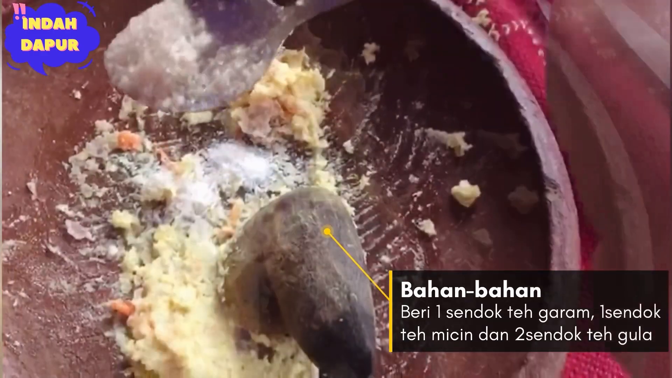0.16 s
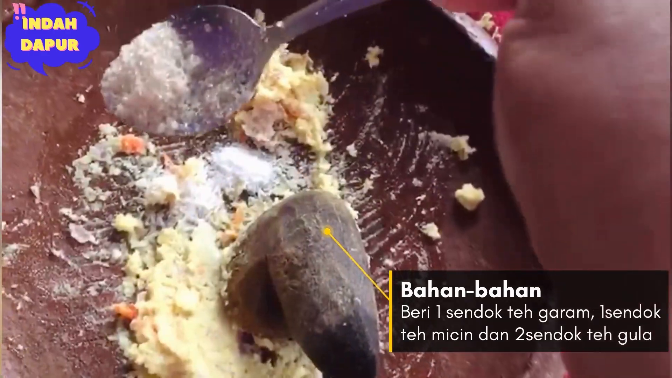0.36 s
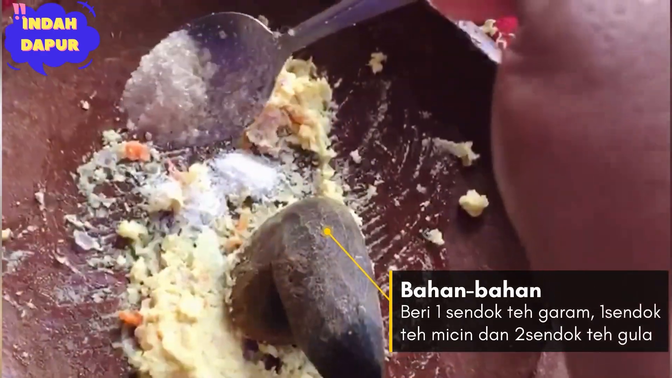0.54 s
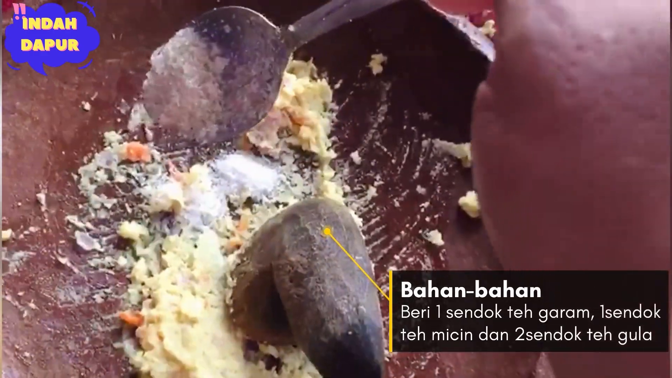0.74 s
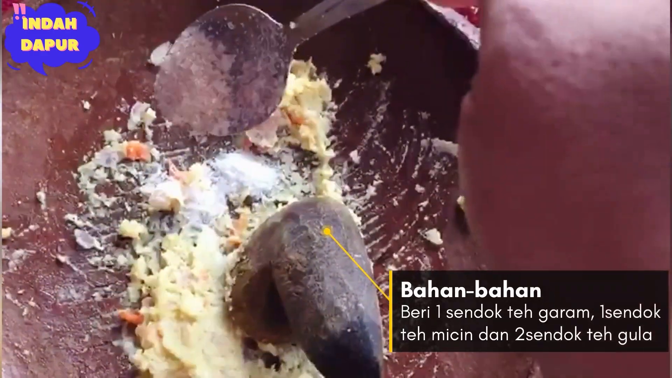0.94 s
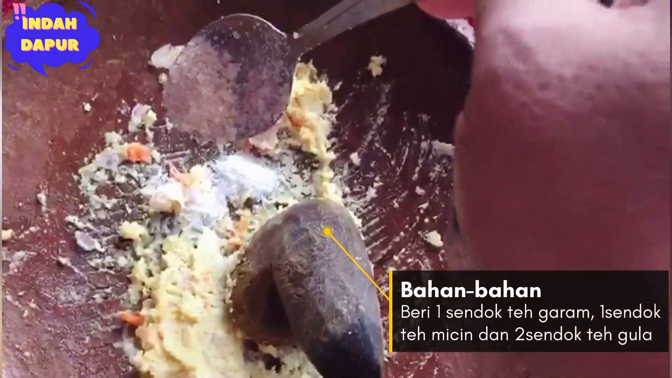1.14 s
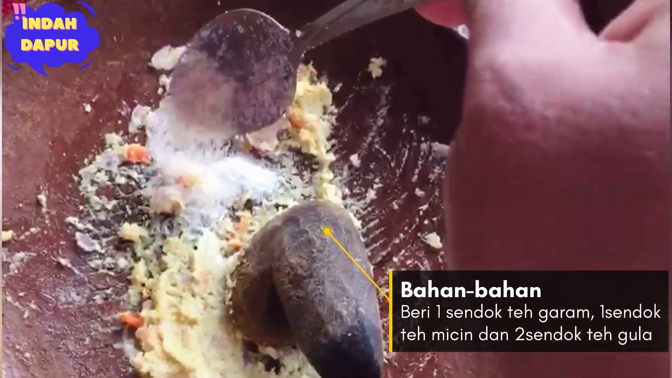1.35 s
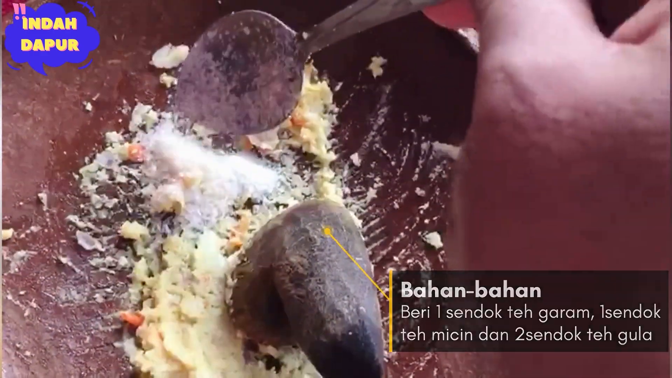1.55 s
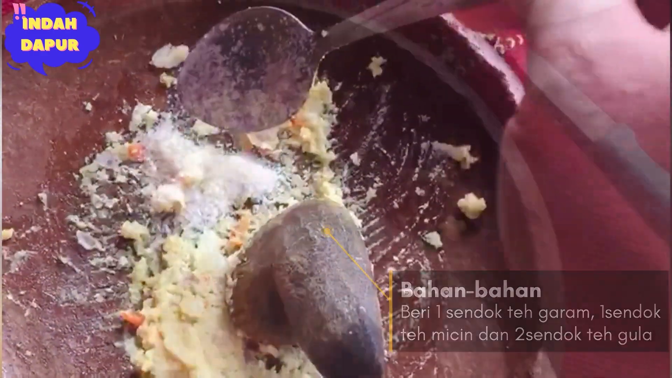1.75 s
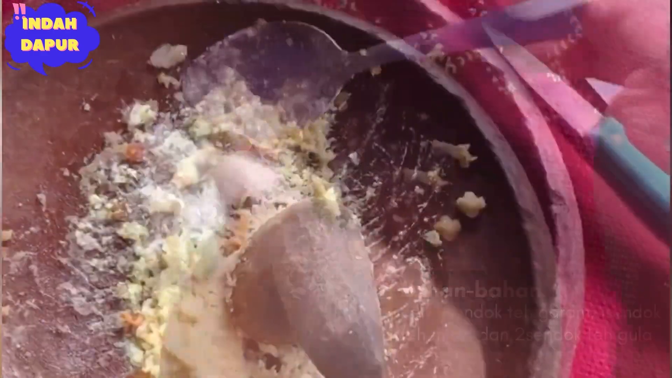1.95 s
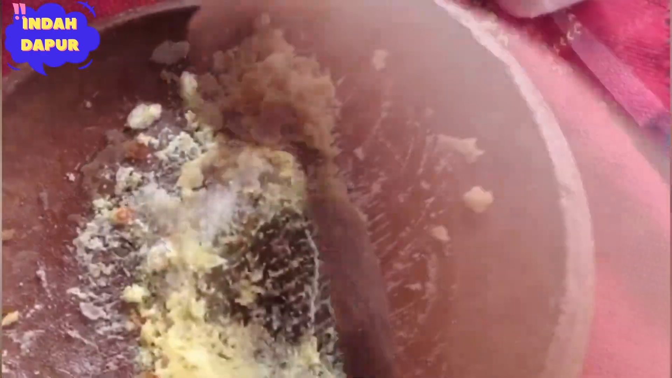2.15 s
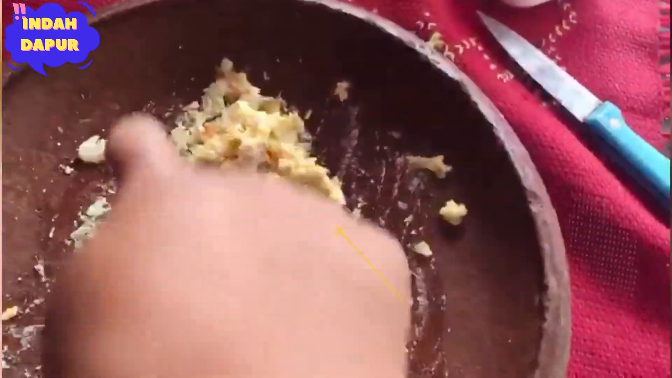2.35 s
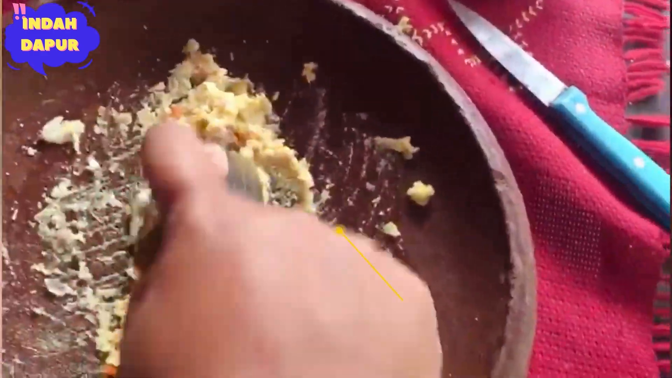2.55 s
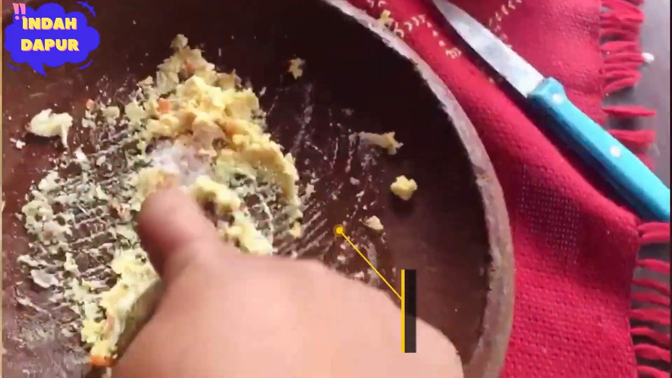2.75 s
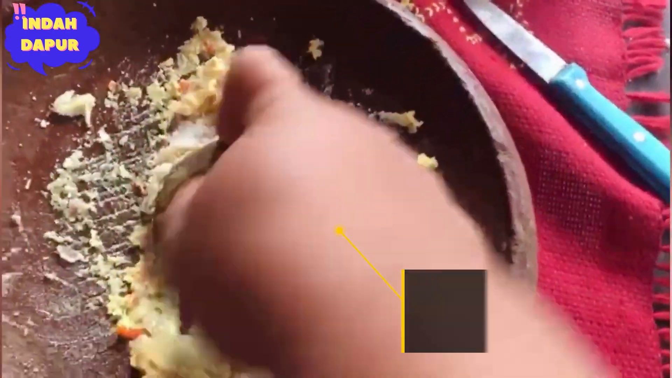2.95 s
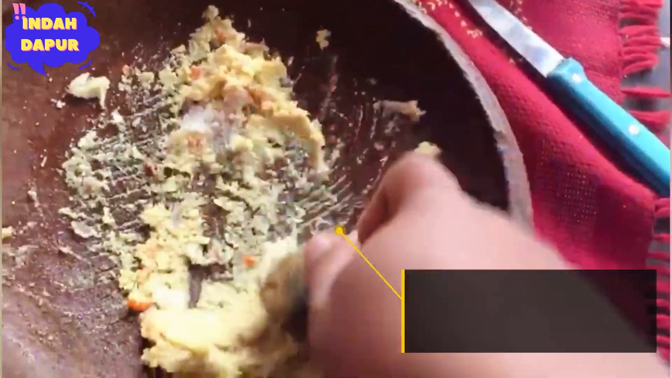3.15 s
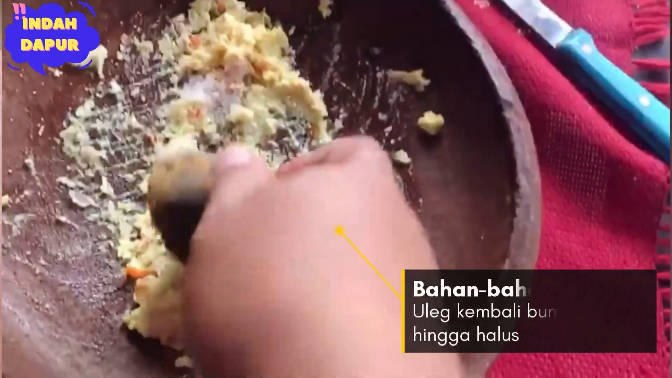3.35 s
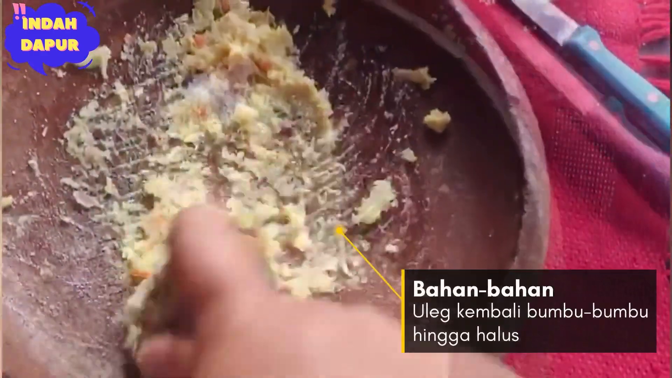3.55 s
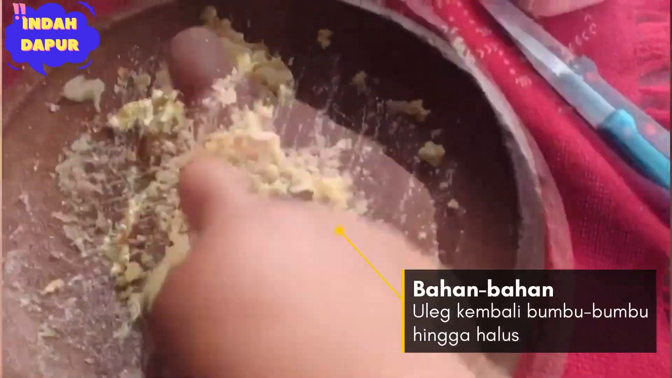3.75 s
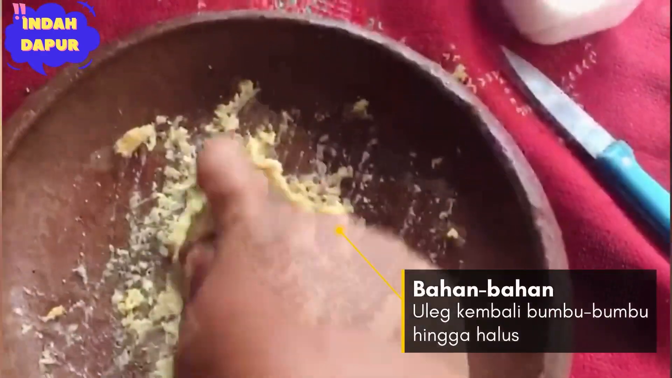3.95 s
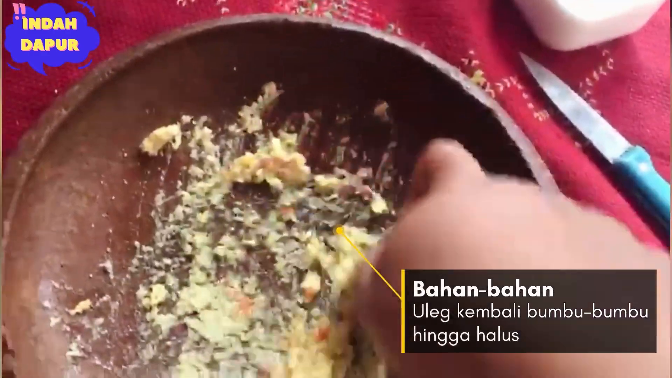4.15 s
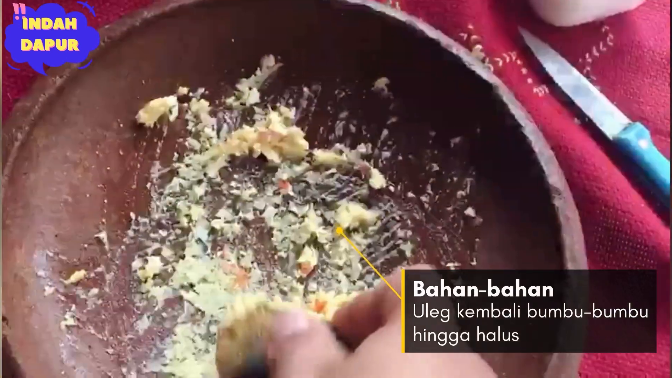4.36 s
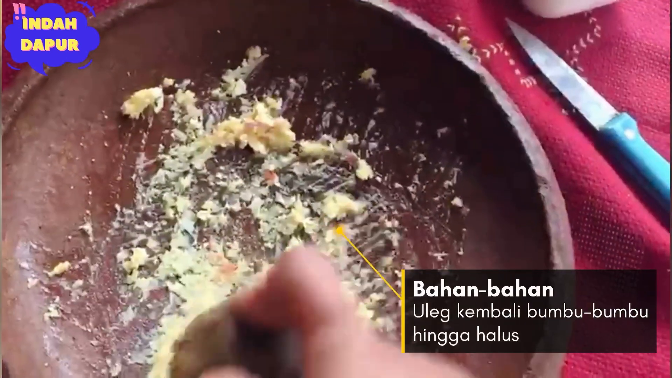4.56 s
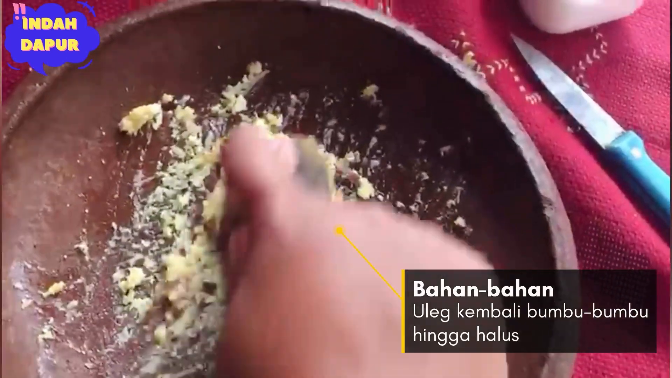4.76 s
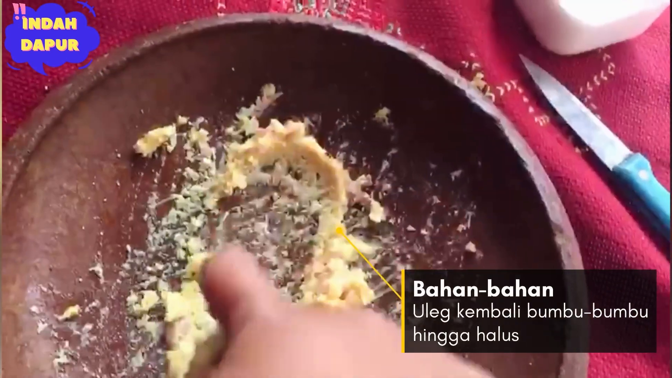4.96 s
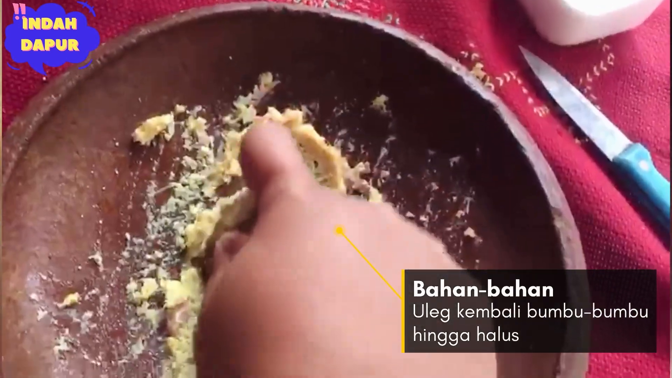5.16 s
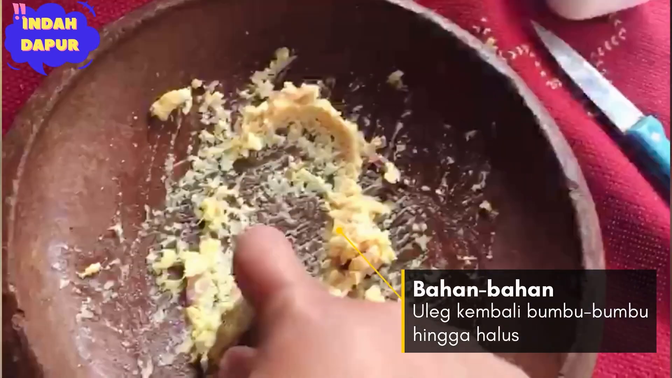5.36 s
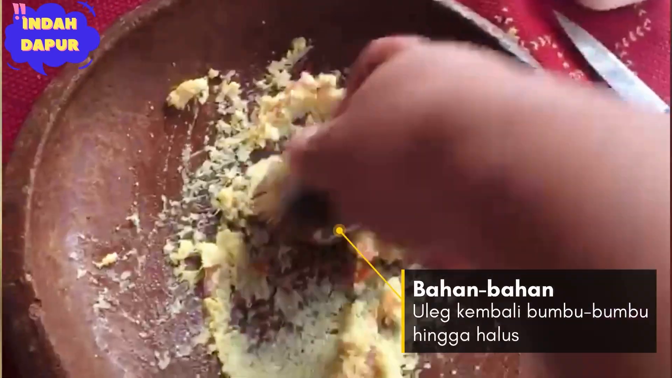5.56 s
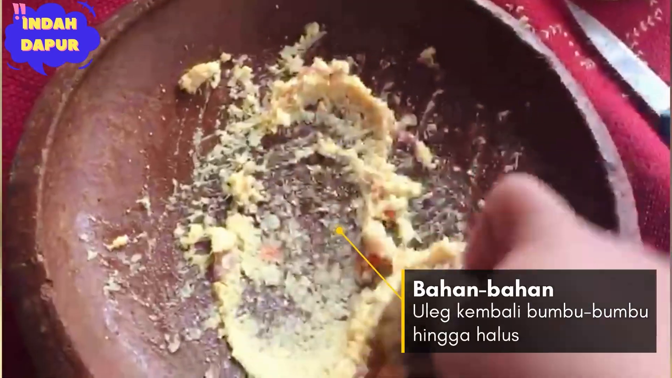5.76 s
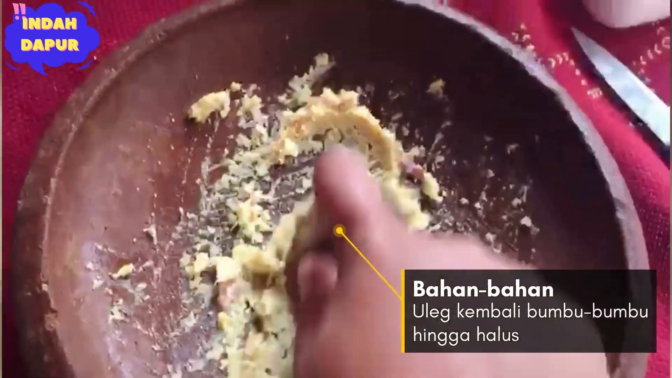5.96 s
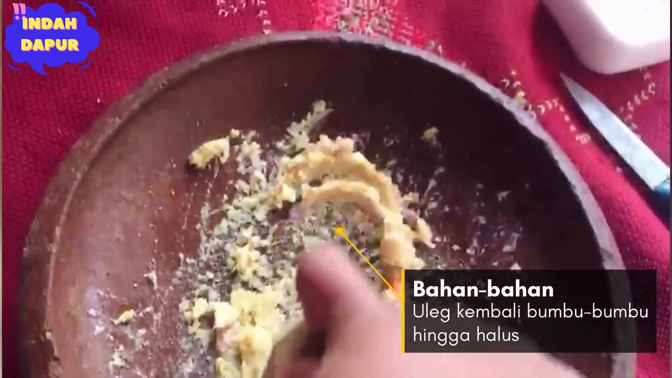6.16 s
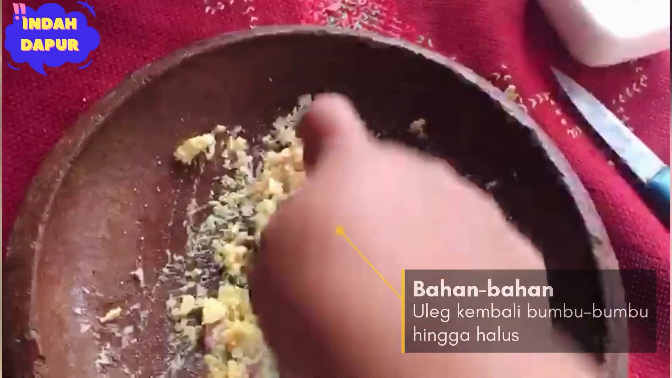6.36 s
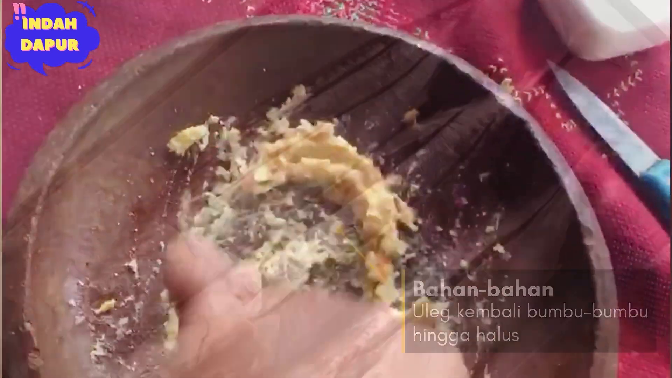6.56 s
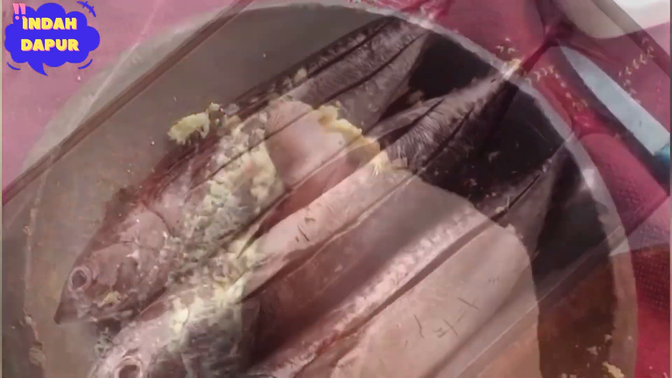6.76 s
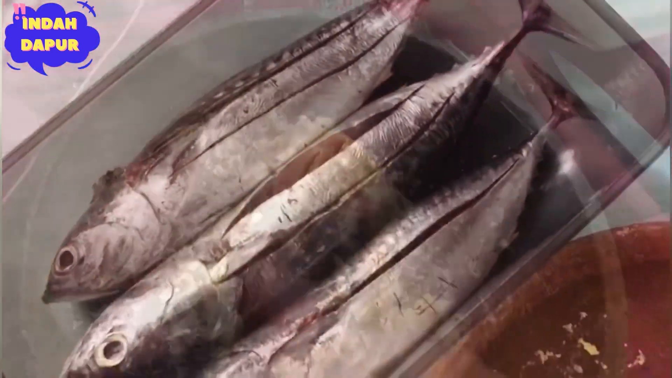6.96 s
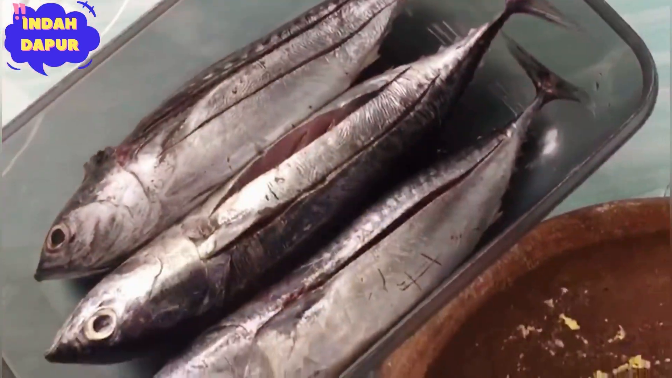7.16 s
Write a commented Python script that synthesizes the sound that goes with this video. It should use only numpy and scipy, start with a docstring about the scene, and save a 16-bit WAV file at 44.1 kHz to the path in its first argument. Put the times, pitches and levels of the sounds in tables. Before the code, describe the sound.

A small kitchen's faint hum and hiss run throughout. Salt and sugar slide off a spoon in three very soft rustles, near 0.1, 0.7 and 1.3 seconds. Around 1.8 and 2 seconds a stone pestle lightly touches the mortar. From about 2.4 seconds it grinds spice paste close to the microphone, scraping to and fro five or six times a second. The strokes are gritty, with crackling crystals, a brief stony ring and irregular sharp clacks, the sharpest near 3.1 seconds. The mortar rumbles low on its cloth, bumps softly around 3.4 to 3.7 seconds, then thumps the table hard near 4.8 seconds and louder still at 6 seconds. The grinding carries on, weakening toward 7 seconds, while a very faint, slightly wavering thin tone enters at about 6.8 seconds. The room adds only a very short reverberation.

```python
"""Close up in a small kitchen, a spoon tips salt and sugar into a shallow stone mortar with soft rustles.
Near 2 s a stone pestle starts on the spice paste, then scrapes to and fro about six times a second:
crystals crackle, the stone rings briefly and bare contacts clack. The mortar rocks on its cloth and
thumps the table hard twice, near 4.8 s and 6 s. A faint thin tone joins the last strokes,
over the room's steady hum and hiss."""
import sys
import numpy as np
from scipy import signal
from scipy.fft import rfft, irfft, next_fast_len
from scipy.io import wavfile
from scipy.ndimage import uniform_filter1d, map_coordinates

SR = 44100
rng = np.random.default_rng(int(sys.argv[2]) if len(sys.argv) > 2 else 0)


def log_audio(samples):
    """Write samples as a 16-bit WAV file to the path given in sys.argv[1]."""
    # one column per channel
    frames = np.atleast_2d(samples).T
    # limit to full scale, then quantise
    limited = np.clip(frames, -1, 1)
    pcm = np.round(limited * 32767).astype(np.int16)
    wavfile.write(sys.argv[1], SR, pcm)


N = 317819

# pestle strokes; ring, scuff, crackle and singing are relative to the rasp: (time [s], length [s],
# rasp [dB], mid-stroke swell [dB], ring [dB], scuff [dB], crackle [dB], singing [dB], rumble [dB])
PESTLE_STROKES = [ (1.803, 0.024, -62.5, 6, 11, 1, -9, -14, -68),
                  (1.985, 0.085, -71.5, -0.5, 7, 12, -2, -15, -82),
                  (2.367, 0.082, -42, 2.5, 3, 5, -6, -23, -67),
                  (2.551, 0.062, -48, -1.5, 8.5, -4, -2.5, -15, -54.5),
                  (2.705, 0.069, -39, 5, 9, -1.5, -2, -15, -64),
                  (2.873, 0.1, -41.5, 6, 5, -8, -6.5, -18, -59),
                  (3.046, 0.024, -55.5, -1, 17.5, 5, -5, -10, -57.5),
                  (3.090, 0.041, -44.5, -2, 7.5, 8, -15, -2, -54),
                  (3.150, 0.057, -49.5, 3, 3, 9, -24, -2, -54),
                  (3.238, 0.043, -46.5, 1, -9, 9.5, -9.5, -4, -66),
                  (3.32, 0.068, -51.5, -2, 4.5, -10, -19, 2.5, -50),
                  (3.584, 0.14, -48, -1, 0, -5, -11.5, -8, -51),
                  (3.744, 0.064, -42.5, 4.5, 4, -5.5, -8, -4, -56),
                  (3.913, 0.13, -42, 2, -1.5, -30, -7, -21, -50.5),
                  (4.125, 0.021, -47.5, 7, 11, 0.5, -13, 17, -54),
                  (4.175, 0.039, -54, -8, -0.5, -3, -26, 8, -47.5),
                  (4.236, 0.06, -44, 0, -22, -6, -12, 5.5, -51.5),
                  (4.387, 0.076, -45, 7, -0.5, -7, -18.5, 3, -47.5),
                  (4.688, 0.093, -46.5, 4.5, 5, 7, -11.5, -29, -46),
                  (4.748, 0.066, -39.5, 0.5, -1.5, -4.5, -9.5, -14, -45),
                  (4.894, 0.11, -39, 5.5, -2.5, -14.5, -8, -10, -56),
                  (5.08, 0.085, -41, -1.5, -4.5, -17, -9, -26, -43.5),
                  (5.261, 0.088, -43, 2.5, 6.5, -7.5, -5.5, -24, -57),
                  (5.444, 0.08, -42, -1, -5, -35, -10, -22, -46.5),
                  (5.704, 0.017, -49.5, 7, 7.5, 2, -6, 10, -57),
                  (5.734, 0.11, -45.5, 1, -27, -5.5, -18, 4, -51),
                  (5.980, 0.025, -28, 6.5, -10, -6.5, -20, -30, -37.5),
                  (6.043, 0.004, -35, 0.5, -21, -12, -8, -27, -60),
                  (6.12, 0.08, -36.5, 2.5, 1, -7, -8, -6.5, -49),
                  (6.291, 0.12, -42, 2, 0.5, -34, -10, -9, -45.5),
                  (6.465, 0.011, -38.5, 6, -13, -6, -27, 18, -47),
                  (6.503, 0.096, -44, -1, 4, -5, -8.5, 2, -49.5),
                  (6.698, 0.085, -47, 0, 0.5, -26, -7.5, -23, -53.5),
                  (6.883, 0.043, -53, -3, 3.5, -18, -6.5, -23, -54),
                  (7.042, 0.026, -58, 4.5, 10.5, -10, -13, -7, -54.5), ]
# the pestle hits bare stone or cracks a crystal: (time [s], level [dB], relative crackle [dB])
PESTLE_CLACKS = [(2.3891, -14.5, -9.5), (2.638, -22, -30), (2.7352, -20, -35), (2.754, -23, -33),
                 (2.878, -27, -38), (2.9253, -18, -39), (2.9435, -14.5, -40), (3.0939, -7, -15),
                 (3.0986, -20, -24), (3.1239, -20.5, -25), (3.411, -30, -22), (3.7428, -13, -14.5),
                 (3.918, -27, -20), (3.954, -17.5, -37), (4.1222, -31, -15.5), (4.3839, -26.5, -25),
                 (4.803, -23.5, -6), (5.0719, -26, -12), (5.087, -44, -13), (5.108, -22.5, -16),
                 (5.2541, -20, -20), (5.462, -22, -30), (5.5704, -37.5, -7.5), (5.7003, -16, -18.5),
                 (5.834, -29.5, -37), (6.0397, -15, -33), (6.1257, -15, -14), (6.1836, -20, -35),
                 (6.464, -21, -16), (6.5033, -15.5, -14), (6.814, -24, -13.5)]
# the mortar lands on the table and bounces: (time [s], level [dB], hardness as low-pass corner [Hz])
TABLE_THUMPS = [(3.371, -46.5, 220), (3.604, -34.5, 324), (3.728, -35.5, 190), (4.774, -17, 520),
                (4.791, -34, 800), (4.803, -37, 400), (5.985, -8.5, 900), (5.991, -19.5, 1300),
                (5.998, -21, 1010)]
# seasoning slides off the spoon: (time [s], length [s], level [dB])
SPOON_RUSTLES = [(0.062, 0.037, -61), (0.664, 0.052, -68), (1.28, 0.026, -67)]
# the stone's resonances: (frequency [Hz], width [Hz], level [dB])
STONE_MODES = [(1498.5, 39.4, 3), (1550, 22, -13), (1930, 46, -5), (2480, 43, -41), (2519, 18, -8),
               (3393, 49, -11.5), (4588, 133, -14), (5787, 47, -17)]
# the pestle singing on bare stone: (frequency [Hz], width [Hz], level [dB])
SINGING_MODES = [(1845, 40, 0), (1930, 70, -8), (2520, 60, -5)]
# the mortar ringing on the table: (frequency [Hz], level [dB], decay t60 [s])
TABLE_MODES = [(115, -5, .25), (198, -5, .18), (236, -4, .27), (297, -6, .15), (372, -6, .13),
               (555, -1, .15), (723, -2, .15), (803, -7, .16), (948, -3, .15), (1260, -4, .15)]
# the tone colour of each layer: (frequency [Hz], relative level [dB])
RASP_EQ = [(500, -27), (1150, -17), (1650, 6), (2400, 4), (2850, -2), (3350, 5.5), (4000, -7.5),
           (4600, -12), (6000, -18), (12000, -36)]  # stone rubbing on grains
SCUFF_EQ = [(150, -68), (300, -24), (460, -25), (750, -2.5), (1050, 1.5), (1300, -17), (2000, 3.5),
            (5000, -51)]  # the dull side of a stroke
CRACKLE_EQ = [(1000, -46), (3000, 15), (4500, 13), (6000, 11), (7500, 5), (8700, 7), (9900, 7.5),
              (10400, -2), (11000, 5.5), (12200, -13)]  # breaking crystals
BOWL_EQ = [(80, -51), (155, 11), (215, 2), (310, 10.5), (420, -32), (800, -58)]  # the bowl's hollow body under a heavy scuff
THUD_EQ = [(30, -29), (75, 0), (120, 1.5), (160, -8.5), (260, 4), (440, -9.5), (700, -9.5), (1000, -7.5),
           (1600, -27), (5000, -59)]  # a blow through the cloth
RUMBLE_EQ = [(30, -34), (60, 2), (85, -1.5), (118, 6.5), (155, -12), (210, -11.5), (330, -16), (600, -49.5),
             (1500, -35)]  # the rocking mortar
SPOON_EQ = [(400, -35), (900, -6), (1200, 7), (1450, -17), (1800, 6), (2050, -5), (2350, 3), (2900, -13),
            (3400, -2), (4200, -33), (12000, -45)]  # loose grains
ROOM_TONE_EQ = [(15, -58), (25, -45), (48, -6.5), (107, -3.5), (135, -14), (170, -10), (379, -17),
                (545, -20), (964, -18.5), (1040, -21), (1420, -20), (1620, -22.5), (1750, -23.5),
                (9180, -34.5), (12200, -41.5), (15900, -52), (22000, -120)]  # hum and hiss
# the kitchen's reverb: (frequency [Hz], decay t60 [s])
KITCHEN_DECAY = [(100, 0.26), (500, 0.17), (2000, 0.15), (10000, 0.32)]

RISE_DB_PER_S, FALL_DB_PER_S = 922, 621  # the pestle bites, and lifts off
RING_FALL_DB_PER_S = 518  # the ring outlasts the rasp
STIFFENING, FIRM_DB = 0.065, -38  # pitch rise (share) from a light to a firm push; rasp of a firm push
GLIDE_PER_S, FINE_GLIDE_PER_S = 0.36, 1.1  # pitch rise along a stroke (share): main and small resonances
HOLD_START_S, HOLD_END_S = 2.28, 8.9  # the hand holds the pestle
RESTING_RASP_DB, RESTING_RUMBLE_DB = -74, -60.5  # what remains between strokes


def grinding():
    """The pestle sticks and slips over the grains, which crackle and excite the stone."""
    rasp, ring, scuff, crackle, bare, travel = stroke_envelopes()
    slips = amp(2.6 * wobble(170) + 2.1 * wobble(80))
    coarse = grit(rate=3500, spread_db=3.5, slips=slips)
    fine = grit(rate=7000, spread_db=7, slips=slips)
    # a firmer grip raises the resonances a little
    grip = np.tanh(rasp / amp(FIRM_DB)) - .5
    bend = 0.009 * wobble(14) + GLIDE_PER_S * travel + STIFFENING * grip
    low_ring = sum(amp(db) * sing(coarse * ring, hz, width, bend) for hz, width, db in STONE_MODES[:2])
    high_ring = sum(amp(db) * sing(coarse * rasp, hz, width, bend) for hz, width, db in STONE_MODES[2:])
    rubbing = amp(1) * through(rasp * fine, colour(RASP_EQ)) + amp(-4) * high_ring
    singing = sum(amp(db) * sing(fine * rasp, hz, width, bend) for hz, width, db in SINGING_MODES)
    # where the paste is thin, rubbing crossfades into singing
    scrape = low_cut((amp(-3) * bare * singing + rubbing) / np.sqrt(1 + bare ** 2), corner_hz=1015)
    dull = amp(-4) * through(scuff * fine, colour(SCUFF_EQ))
    crystals = amp(-1) * through(crackle * (coarse + fine), colour(CRACKLE_EQ))
    bowl = amp(-22) * through(scuff * coarse, colour(BOWL_EQ))
    gritty = moving_contact(scrape + dull + crystals, travel, depth_db=4)
    return bowl + gritty + low_cut(amp(-6.5) * low_ring, corner_hz=1000)


def stroke_envelopes():
    """The hand's pushes as four layer gains, the bareness of the stone and the pestle's travel."""
    rasp = amp(RESTING_RASP_DB) * hand_resting()
    ring, scuff, crackle = np.zeros((3, N))
    thinness, path = [], []
    for s, length, db, swell_db, ring_db, scuff_db, crackle_db, singing_db, _ in PESTLE_STROKES:
        force = amp(db) * envelope(s, length, swell_db)
        rasp = np.maximum(rasp, force)
        scuff = np.maximum(scuff, amp(scuff_db) * force)
        crackle = np.maximum(crackle, amp(crackle_db) * force)
        ring = np.maximum(ring, amp(db + ring_db) * envelope(s, length, swell_db, fall=RING_FALL_DB_PER_S))
        thinness += [(s, singing_db), (s + length, singing_db)]
        path += [(s, -length / 2), (s + length, length / 2)]
    t = np.arange(N) / SR
    bare = amp(np.interp(t, *np.transpose(sorted(thinness))))
    travel = np.interp(t, *np.transpose(sorted(path)))  # seconds past mid-stroke
    return rasp, ring, scuff, crackle, bare, travel


def moving_contact(x, travel, depth_db):
    """As the contact travels, a changing set of the stone's small resonances stands out and glides up."""
    spectrum = signal.stft(x, nperseg=1024)[2]
    peaks = uniform_filter1d(rng.standard_normal(spectrum.shape), size=4, axis=0)
    peaks = uniform_filter1d(peaks, size=8, axis=1)
    bins, frames = np.indices(spectrum.shape)
    glide = np.exp(FINE_GLIDE_PER_S * travel[np.minimum(frames * 512, N - 1)])
    peaks = map_coordinates(peaks, [bins / glide, frames], order=1, mode="nearest")
    gain = amp(depth_db * peaks / peaks.std())
    return signal.istft(spectrum * gain / np.sqrt(np.mean(gain ** 2)), nperseg=1024)[1][:N]


def hand_resting():
    """A gate that opens while the hand rests on the pestle."""
    return envelope(HOLD_START_S, HOLD_END_S - HOLD_START_S)


def clacks(chatter_t60=0.045, chatter_db=-19):
    """A hard contact with a short tail of chatter rings the stone and snaps a crystal."""
    t = np.arange(SR // 20) / SR
    blows, snaps = np.zeros((2, N + SR))
    for s, db, crackle_db in PESTLE_CLACKS:
        contact = amp(chatter_db - 60 * t / chatter_t60) * rng.standard_normal(len(t))
        contact[0] = 1
        blows[round(s * SR):][:len(t)] += amp(db) * contact
        snaps[round(s * SR):][:len(t)] += amp(db + crackle_db) * contact
    ring = amp(1.5) * through(blows, resonances(STONE_MODES))
    click = amp(-2) * through(blows, colour(RASP_EQ))
    crystals = amp(8.5) * through(snaps, colour(CRACKLE_EQ))
    return ring + click + crystals


def thumps(ring_db=-24.5, rattle_db=-24.5, rattle_t60=0.13):
    """A low push through the cloth rings and rattles the table; each landing has its own hardness."""
    t = np.arange(8192) / SR
    # bending waves in the table top bring the highs first and the lows a few milliseconds later
    dispersion = np.exp(-4j * np.arctan(np.fft.rfftfreq(len(t), 1 / SR) / 260))
    push = irfft(rfft(colour(THUD_EQ)) * dispersion)
    attack = 1 - np.exp(-t / 0.00044)
    out = np.zeros(N + SR)
    for s, db, corner_hz in TABLE_THUMPS:
        ring = np.zeros(len(t))
        for hz, mode_db, t60 in TABLE_MODES:
            decay = amp(mode_db + rng.normal(0, 1) - 60 * t / t60)
            ring += decay * np.sin(2 * np.pi * (hz * t + rng.random()))
        chatter = amp(rattle_db - 60 * t / rattle_t60) * rng.standard_normal(len(t))
        rattle = signal.fftconvolve(chatter, push)[:len(t)]
        blow = push / np.abs(push).max() + amp(ring_db) * ring * attack + rattle
        blow = signal.lfilter(*signal.butter(2, corner_hz, fs=SR), blow)
        out[round(s * SR):][:len(t)] += amp(db) * blow / np.abs(blow).max()
    return out[:N]


def rocking():
    """The heavy mortar follows the hand slowly, rumbling on the table as it bears down."""
    weight = amp(RESTING_RUMBLE_DB) * hand_resting()
    for s, length, *_, rumble_db in PESTLE_STROKES:
        weight = np.maximum(weight, amp(rumble_db) * envelope(s, length, rise=505, fall=300))
    return amp(-3) * through(weight * grit(rate=670, spread_db=7.5), colour(RUMBLE_EQ))


def spoon():
    """Loose grains rustle softly as the spoon tips them in."""
    flow = sum(amp(db) * envelope(s, length, rise=810, fall=160) for s, length, db in SPOON_RUSTLES)
    return amp(2) * through(flow * grit(rate=3800, spread_db=1), colour(SPOON_EQ))


def thin_tone(start_s=6.81):
    """A faint, slightly wavering tone under the last strokes."""
    waver = 0.005 * wobble(2.9)
    tone = sing(rng.standard_normal(N), hz=1362, width_hz=18, bend=waver)
    return amp(-65) * envelope(start_s, N / SR) * tone


def kitchen_reverb(x, predelay_s=0.0054):
    """The small room's short tail, in which the mids die first."""
    hz, t, noise = signal.stft(rng.standard_normal(SR // 2), SR, nperseg=256)
    decay = amp(-60 * t / along(KITCHEN_DECAY, hz)[:, None])
    tail = signal.istft(noise * decay, SR, nperseg=256)[1]
    return through(x, np.pad(normed(tail), (round(predelay_s * SR), 0)))


def room_tone():
    """The quiet room's steady bed of hum and hiss."""
    return amp(-61 + 0.057 * wobble(2.37)) * through(rng.standard_normal(N), colour(ROOM_TONE_EQ))


def envelope(start_s, length_s, swell_db=0, rise=RISE_DB_PER_S, fall=FALL_DB_PER_S):
    """An attack, a hold that arches to gain 1 at its middle, and a release; rise and fall in dB/s."""
    since = np.arange(N) / SR - start_s
    arch = (2 * np.clip(since / length_s, 0, 1) - 1) ** 2
    db = rise * np.minimum(since, 0) - fall * np.maximum(since - length_s, 0) - swell_db * arch
    return np.where(db > -60, amp(db), 0)


def grit(rate, spread_db, slips=1):
    """Tiny cracks of random size, rate a second, bunched by the slips and levelled over 25 ms."""
    hits = rng.random(N) < rate / SR
    cracks = hits * rng.standard_normal(N) * amp(spread_db * rng.standard_normal(N)) * slips
    return cracks / np.sqrt(np.abs(uniform_filter1d(cracks ** 2, size=1100)) + 1e-9)


def sing(x, hz, width_hz, bend):
    """x rings one resonance of unit power gain, whose pitch is bent by a share at each moment."""
    turn = np.exp(2j * np.pi * np.cumsum(hz * (1 + bend)) / SR)
    feedback = np.exp(-np.pi * width_hz / SR)
    return np.imag(turn * signal.lfilter([np.sqrt(2 * (1 - feedback ** 2))], [1, -feedback], x / turn))


def resonances(modes):
    """The impulse response of struck modes; wider ones die sooner."""
    t = np.arange(SR // 10) / SR
    return normed(sum(amp(db) * width * np.exp(-np.pi * width * t) * np.sin(2 * np.pi * hz * t)
                      for hz, width, db in modes))


def colour(eq, size=8192):
    """The minimum-phase impulse response of an EQ curve."""
    cepstrum = irfft(np.log(amp(along(eq, np.fft.rfftfreq(size, 1 / SR)))))
    cepstrum[1:size // 2] *= 2
    cepstrum[size // 2 + 1:] = 0
    return normed(irfft(np.exp(rfft(cepstrum))))


def low_cut(x, corner_hz):
    """A small body radiates little below its corner."""
    return signal.sosfilt(signal.butter(3, corner_hz, "high", fs=SR, output="sos"), x)


def wobble(rate):
    """A smooth random curve with rate knots a second."""
    return map_coordinates(rng.standard_normal(4096), [np.arange(N) * rate / SR], order=2, mode="wrap")


def through(x, response):
    """x played through an impulse response."""
    return signal.fftconvolve(x, response)[:N]


def normed(response):
    """An impulse response scaled to energy 1."""
    return response / np.linalg.norm(response)


def along(points, hz):
    """(frequency [Hz], value) points read on a log axis."""
    knots_hz, values = np.transpose(points)
    return np.interp(np.log(hz + 1), np.log(knots_hz + 1), values)


def amp(db):
    """Decibels to gain."""
    return 10 ** (np.asarray(db) / 20)


def scene():
    """The mono mix: mortar and pestle up close, with stone and table sent to the kitchen's reverb."""
    stone = grinding() + low_cut(clacks(), corner_hz=704)
    table = low_cut(thumps(), corner_hz=97)
    close = stone + table + rocking() + spoon() + thin_tone()
    reverb = kitchen_reverb(amp(-14) * stone + amp(-5) * table)
    return (close + reverb + room_tone())[None]


def record(dry, top_hz=12200):
    """A brick-wall high cut takes off the top of the treble."""
    size = next_fast_len(N + SR // 2)
    passband = np.fft.rfftfreq(size, 1 / SR) < top_hz
    return irfft(rfft(dry, size) * passband, size)[:, :N]


dry = scene()
out = record(dry)
log_audio(out)
```